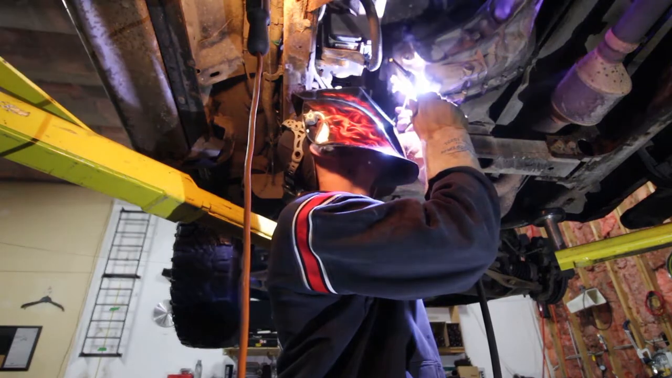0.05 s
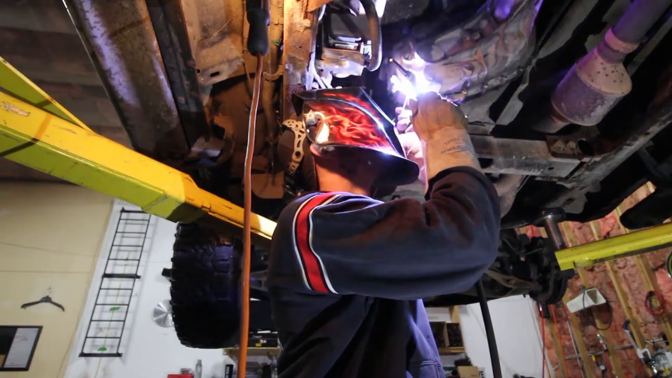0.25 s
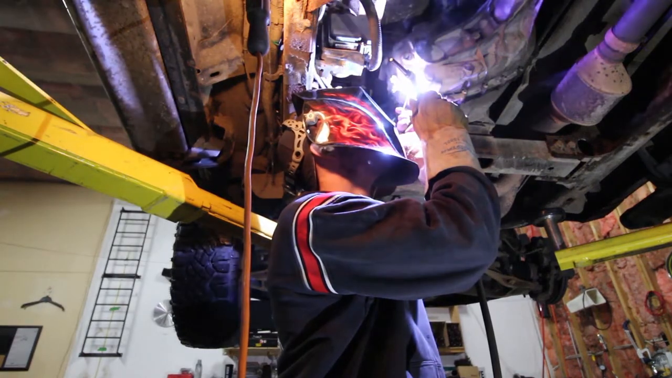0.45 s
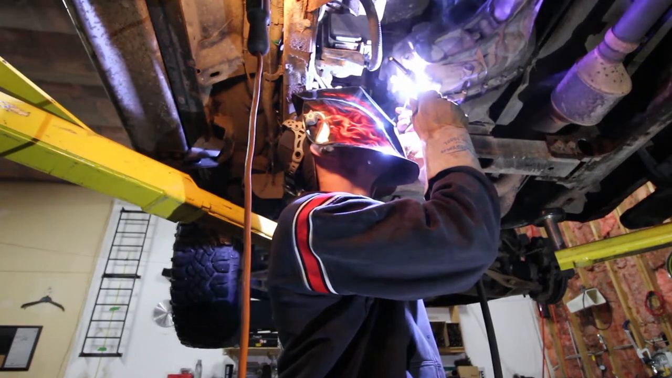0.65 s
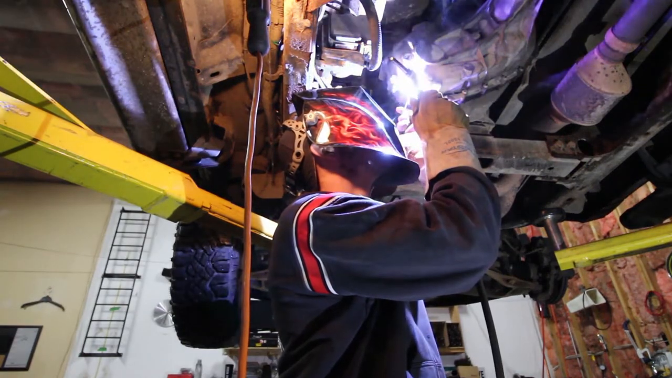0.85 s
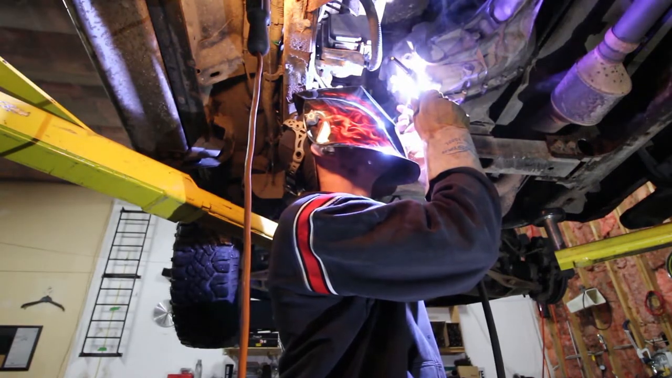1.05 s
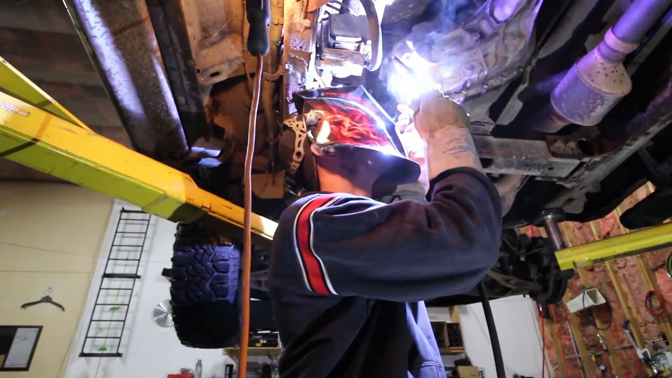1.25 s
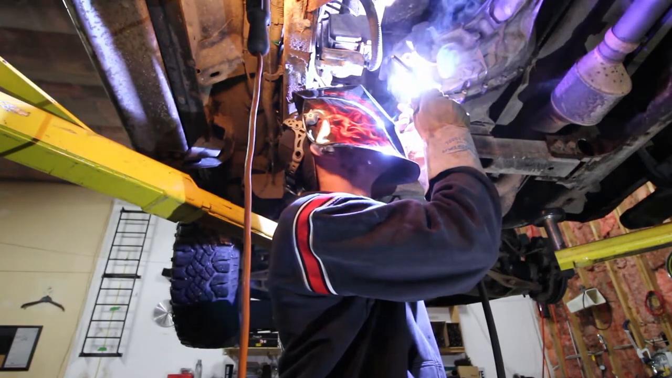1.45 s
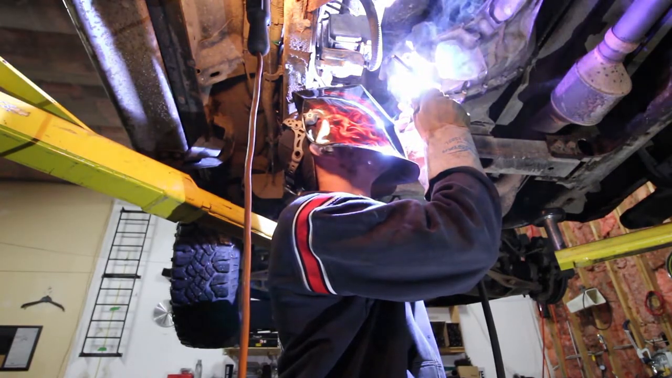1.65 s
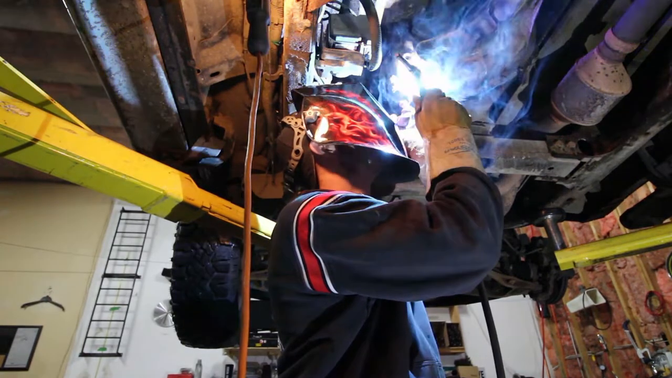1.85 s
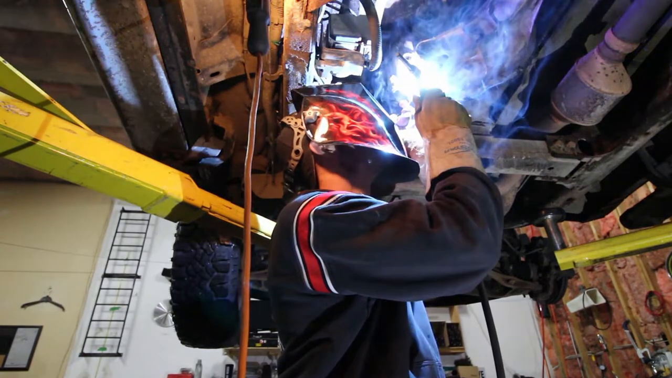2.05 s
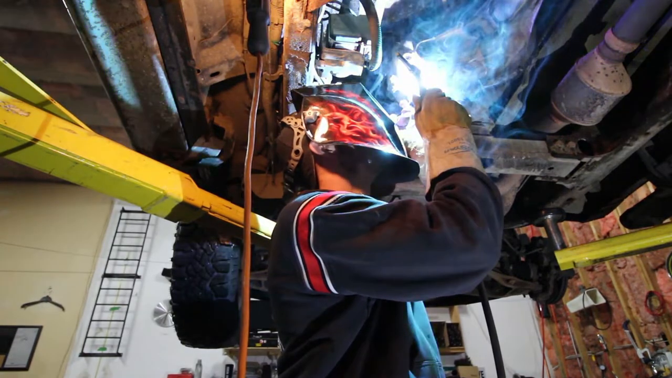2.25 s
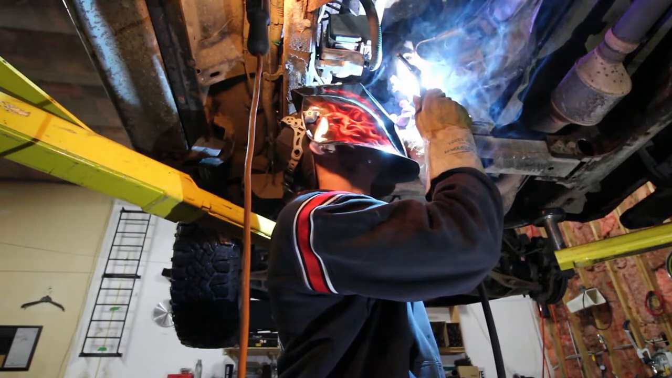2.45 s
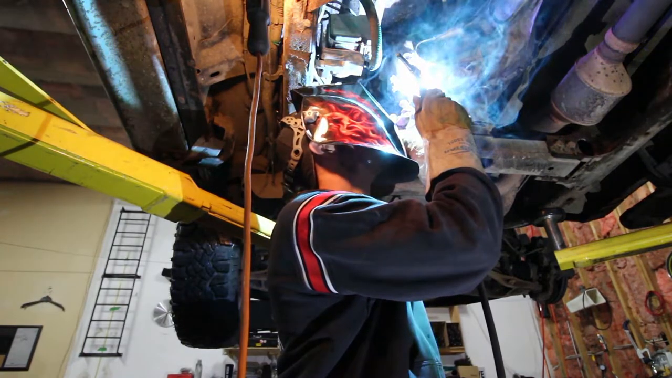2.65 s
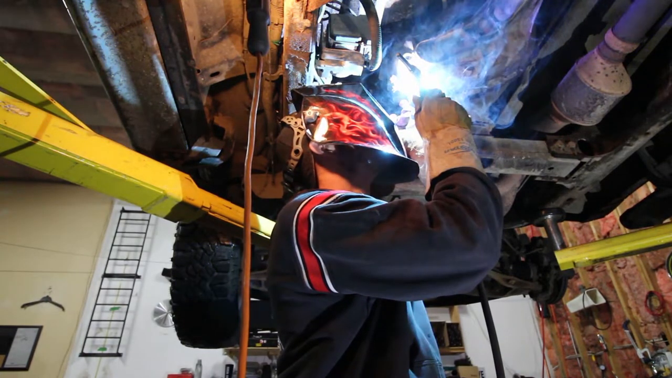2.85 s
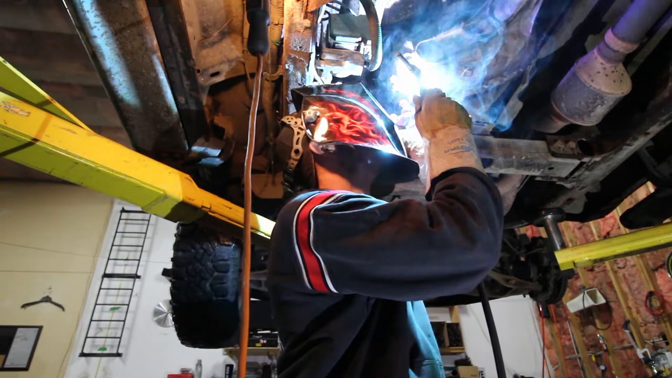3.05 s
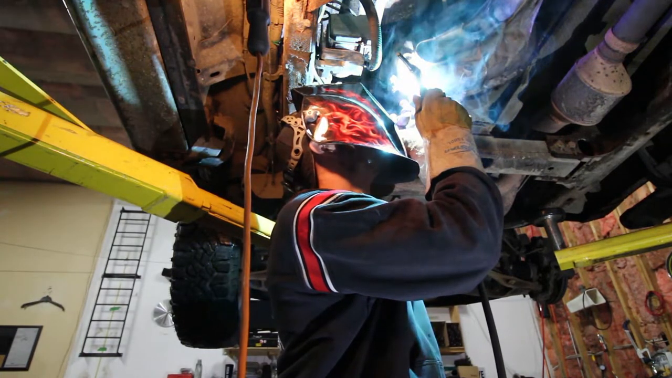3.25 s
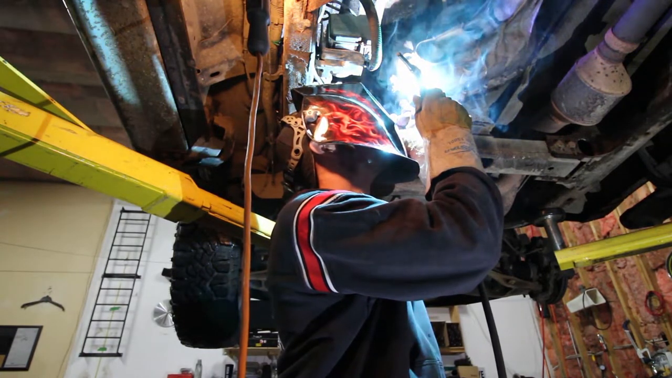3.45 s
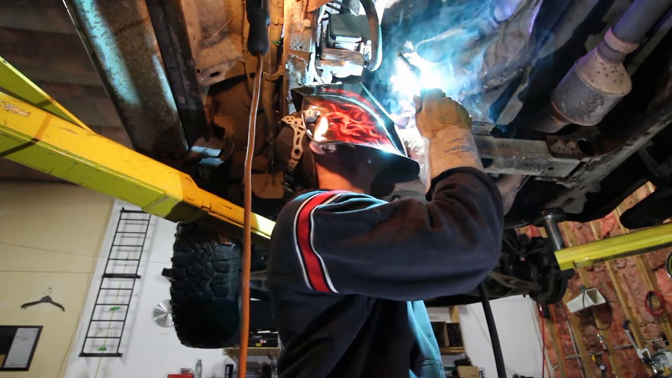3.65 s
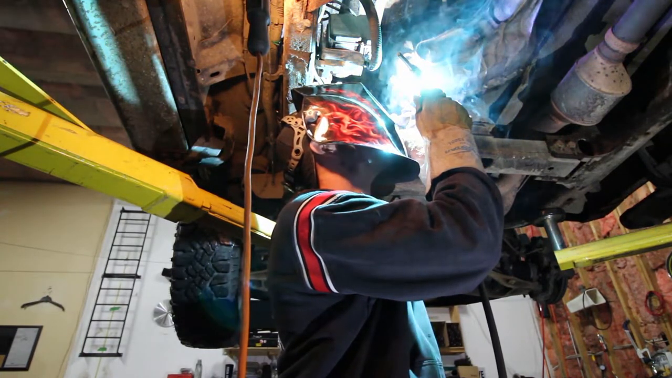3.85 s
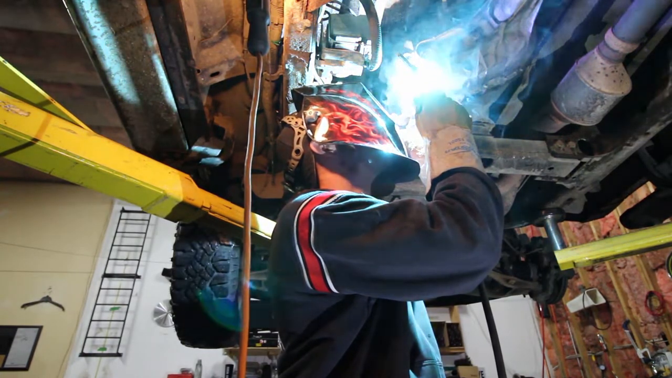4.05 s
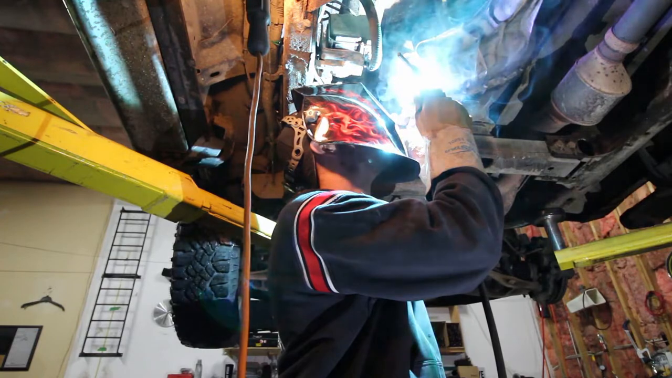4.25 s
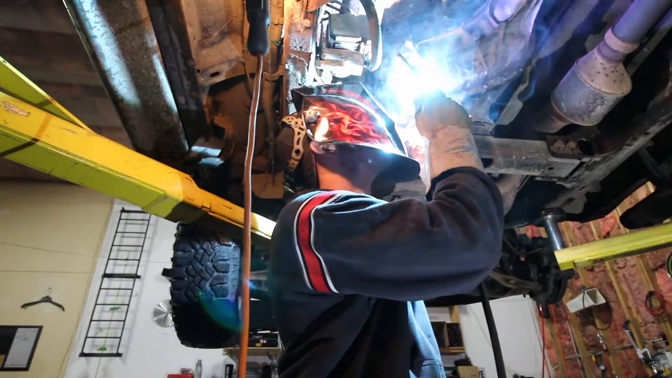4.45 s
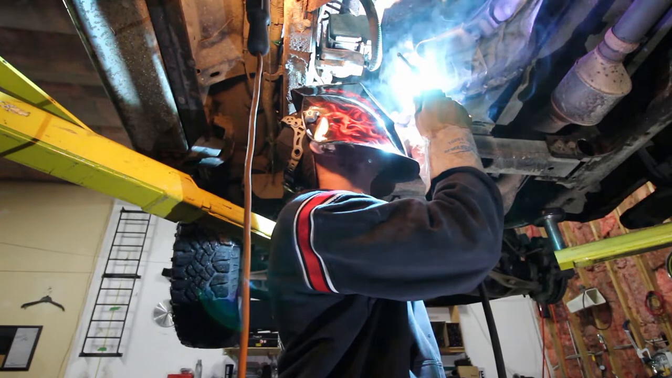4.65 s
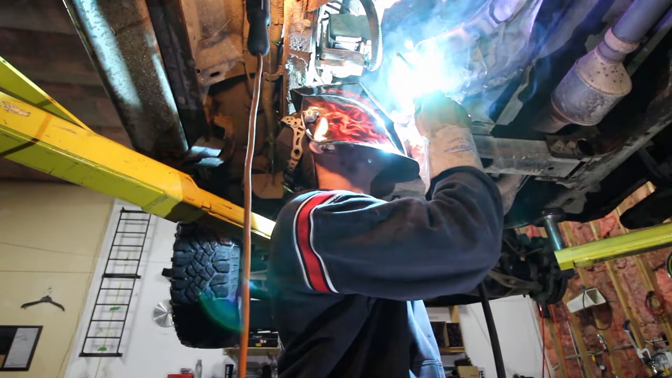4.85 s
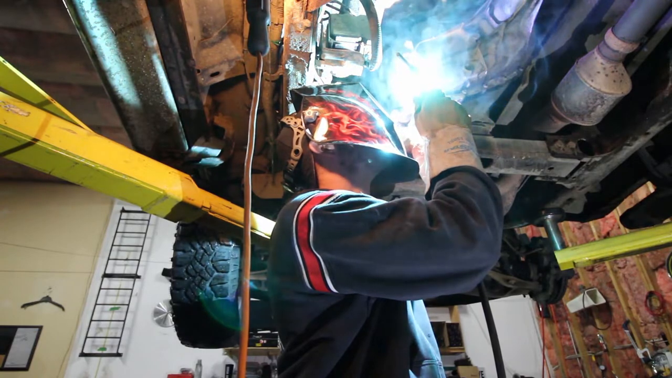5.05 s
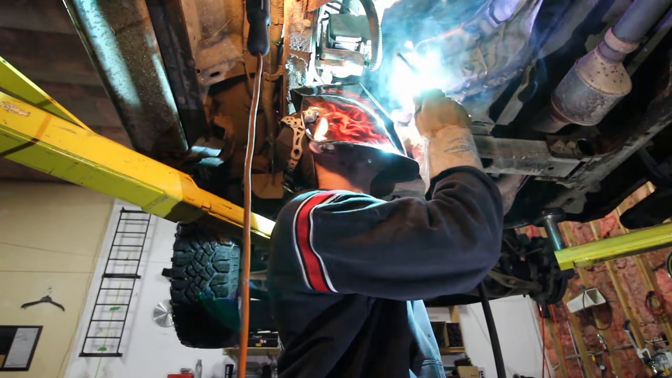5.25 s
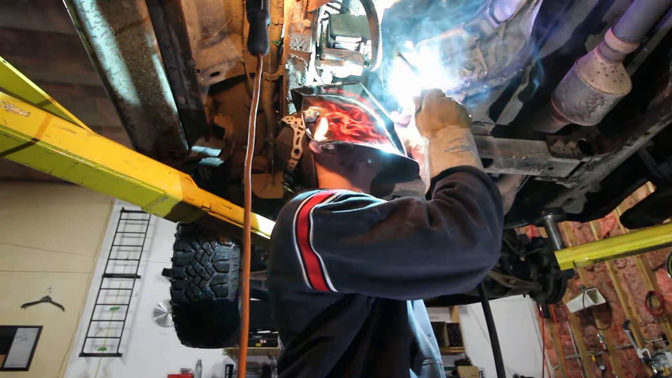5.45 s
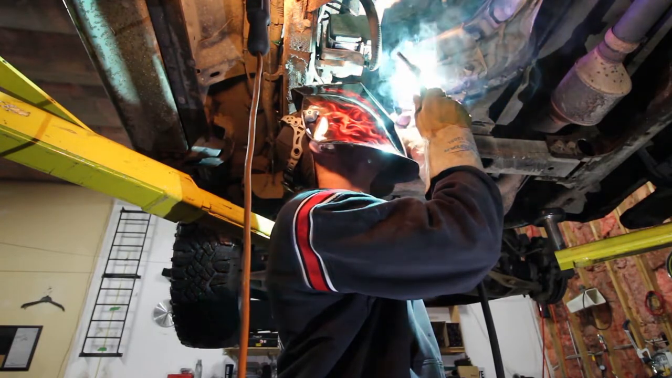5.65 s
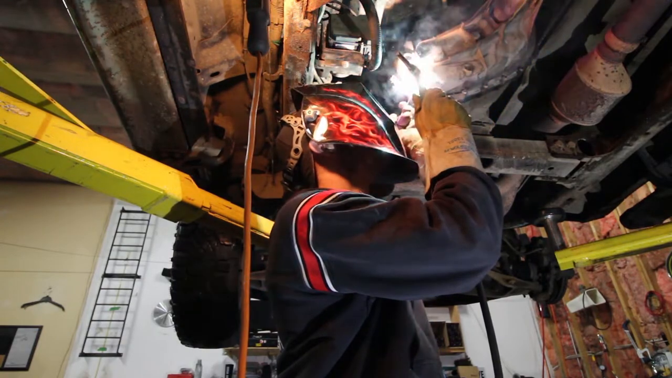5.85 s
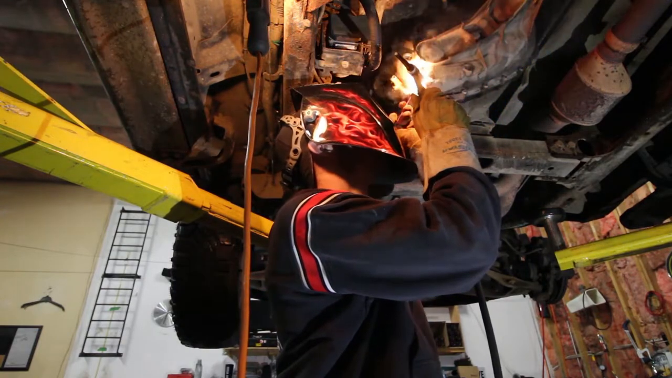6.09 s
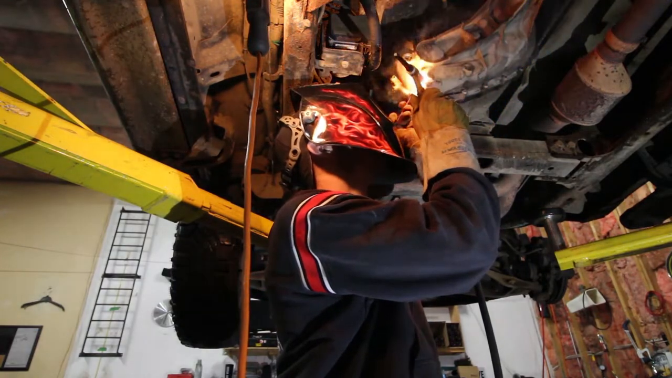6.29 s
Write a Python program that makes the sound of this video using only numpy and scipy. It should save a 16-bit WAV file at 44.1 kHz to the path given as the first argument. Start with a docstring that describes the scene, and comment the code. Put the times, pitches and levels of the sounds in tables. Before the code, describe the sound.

A welder works beneath a raised car in a garage, heard close. The arc rasps steadily at a low sixty-cycle pitch, sizzling and spitting, with low transformer hum beneath. It hitches once early and becomes more metallic; a few heavy pops punch through. Near the end it misfires with a loud spit, eases down and stops, while gas keeps hissing softly.

```python
"""An AC TIG arc burns on aluminium under a car on a garage lift: two impulse snaps per mains cycle, noise
sizzle through one half cycle, and spits at listed times, all ringing in a resonant underbody response.
The welder hums in sine partials that follow the current; low puffs come with some spits. At 1.83 s the
buzz skips and changes colour. The current is eased off, the arc goes out, and the gas noise hisses on."""
import sys
import numpy as np
from scipy import signal
from scipy.fft import rfft, irfft
from scipy.io import wavfile
from scipy.ndimage import uniform_filter1d

SR = 44100
rng = np.random.default_rng(int(sys.argv[2]) if len(sys.argv) > 2 else 0)


def to_wav(sig):
    """Store sig (one row per channel, or 1-D mono) as 16-bit WAV at the path in sys.argv[1].

    Samples outside -1..1 are clipped; the rate is SR.
    """
    pcm = np.clip(np.atleast_2d(sig), -1, 1) * 32767
    pcm = np.round(pcm).astype(np.int16)
    wavfile.write(sys.argv[1], SR, pcm.T)  # frames by channels


N = 278712
T = np.arange(N) / SR

# welding current re full: start_s, level_db
CURRENT = [(0, -4), (.4, -3.5), (.6, -2), (.98, -2), (1.25, -0.5), (1.5, -0.5), (1.72, -1.5), (1.83, -1.5),
           (1.92, -1.9), (2.8, -1.58), (4.9, 0.2), (5.33, -0.2), (5.45, -3), (5.6, -1.5), (5.7, -3.5),
           (5.85, -11), (5.96, -3)]
# first strike on the oxide: start_s, level_db
STRIKE = [(0, -6), (.5, 1), (.72, -1.5), (.88, -4), (1.04, -5.5), (1.3, -2.5), (1.44, -4), (1.8, -2.5),
          (2, -3), (2.5, -1.5), (3.1, -0.5), (3.5, -3), (4.9, 5), (5.3, 4.5), (5.47, -5), (5.63, 1),
          (5.78, -15.5), (5.96, -15)]
# fullness of the first strike, lows: start_s, level_db
BODY = [(0, 3.5), (.6, -5), (.95, 9), (1.25, 5.5), (1.45, 7), (1.8, 4), (2.2, -3.5), (3.2, 3), (3.85, 4.5),
        (4.45, -3), (5.3, -5), (5.5, -1), (5.62, -9.5), (5.96, 9)]
# treble of the snaps, duller as the pool melts, brighter as it cools: start_s, level_db
TREBLE = [(0, 2.5), (.95, 1.5), (1.25, 6), (1.5, 3.5), (1.9, 2.5), (2.9, 1), (3.7, -3.5), (5.25, -20),
          (5.5, 1.5), (5.96, -2.5)]
# unrest from cycle to cycle; the sign flips the skew of the scatter: start_s, scatter_db
UNREST = [(0, -4.5), (.9, 3.5), (1.2, -3), (1.5, 3), (1.9, 7.5), (3.5, 5), (4.6, 5), (5.2, 5.5), (6, 6.5)]
# re-strikes that flare up, thickest while the oxide is cold: start_s, low_db, middle_db, ring_db, treble_db
SPITS = [(0.0288, -8, -7.5, -2, -4), (0.0623, -10, -6, -5, -10), (0.1454, -9, -9, -13, -16),
         (0.178, -8.5, -11, -15, -9), (0.2121, -6, -4.5, -19, -10), (0.2286, -9, -10, -23, -11),
         (0.2457, -8.5, -16, -5, -7), (0.2788, -10, -6, -7, -6.5), (0.2954, -6.5, -10, -4, -8),
         (0.3123, -11, -7, -11, -10), (0.3287, -13, -7.5, -5.5, -9), (0.3622, -22, -7, -7, -7.0),
         (0.4123, -7.5, -10, -6, -9), (0.4453, -9, -5, -2, -6), (0.4789, -9, -3, -10, -12),
         (0.5124, -10, -2.5, -1.0, -2), (0.5454, -5.5, -1, -9, 0), (0.563, -11, -3, 0, 1),
         (0.5785, -6, -3, 2, 2), (0.612, -0.5, 3, 3, 1.5), (0.6285, -6, -4, 0.5, -1.0),
         (0.6788, -3, -4.5, -13, -6), (0.6956, -5, -14, -7.0, -6), (0.7285, -4, -9, -4, -9),
         (0.7454, -5.5, -6, -11, -7), (0.7624, -6.5, -2, -6, -10), (0.812, -6, -3, -8, -13),
         (0.8289, -5.5, -10, -7, -12), (0.8455, -4, -11, -13, -11), (0.8621, -8, -5, -5, -11),
         (0.9957, -8, -12, -3.0, -2.0), (1.379, -3.5, -1, -7, -3.0), (1.3955, -1.5, -11, -5, -4),
         (1.4122, 0.5, -5, -2.0, -3), (1.4292, -1, -6, -12, -1), (1.4458, -2, -4, -18, -4),
         (1.4789, -2, -3, -8, -3), (1.4956, -1.5, -10.5, -5, -5), (1.5121, -4, -12, -12, -6),
         (1.5289, -6, -1, -15, -8), (1.5622, -1.5, -10, -8, -9), (1.5955, -2, -6, -9, -3),
         (1.6282, -7, -4, -5, -5), (1.662, -10, -3, -7, -4), (1.6949, -9, -8, -5.5, -4),
         (1.7463, -2.5, -15, -4, -3), (1.941, -9, -17, -7, -4), (1.958, -9.5, -14, -7, -6),
         (1.9742, -14, -15, -5, -6), (2.0073, -16, -7, -6, -3.5), (2.0243, -7, -7, -10, -6),
         (2.041, -9, -12, -3, -5), (2.0909, -15, -12, 0, -2), (2.391, -8.5, -7, -6.5, -0.5),
         (2.591, -5.5, -5.5, -0.5, 4), (2.741, -13.5, -11, -6, -3.5), (3.1076, -8, -9, -4, -3),
         (3.5078, -3, 0.5, 0, 1), (3.8241, 3, -6, 0.5, -1), (4.241, -4, -6, 2.5, -3), (5.421, 0, -23, 2, 2),
         (5.4246, -25, -13, -5, -11), (5.5245, -12, -13, -12, -6), (5.6077, -11, -6, -3.5, -4),
         (5.6244, -8, -8, -2, -1.5), (5.6412, -12, -6, -14, -7), (5.6579, -10, -9, -13, -8),
         (5.6745, -15, -16, -11, -5), (5.6912, -27, -11, -16, -6), (5.8412, -22, -27, -32, -23),
         (5.8582, -23, -30, -28, -17), (5.9078, -21, -19, -20, -13.5), (5.9248, -27, -22, -26, -17),
         (5.9656, -15, -12.5, -12, -8)]
# borders of the four registers of a spit: edge_hz
SPIT_EDGES_HZ = (2200, 3600, 5700)
# span in which the arc fails before its heaviest spit: start_s, end_s
MISFIRE_S = (5.404, 5.42)
# oxide burning off: start_s, level_db
SIZZLE = [(0, -5), (.45, -10.5), (.6, -6), (1.0, -5), (1.3, -4), (1.95, -7.5), (2.35, -1.5), (2.6, -7.5),
          (3.75, 0.5), (4.35, -2), (4.55, -1.5), (4.8, -2.5), (5.2, -7), (5.39, 2.5), (5.46, -12.5),
          (5.96, -14.5)]
# colour of the sizzle: freq_hz, level_db
SIZZLE_COLOUR = [(40, -12), (200, 2.5), (1200, 0), (3200, 0), (5200, -2), (8000, -3.5), (15000, -2.5)]
# colour of a snap before and after the skip: freq_hz, level_db
SNAP_EARLY = [(30, -60), (60, -41), (200, -18), (450, -17), (650, -9.5), (1200, -6.5), (2000, -5),
              (3000, -7), (5200, -1), (8500, -5.5), (12000, -4.5), (15700, -16.5)]
SNAP_LATE = [(30, -54), (60, -49), (200, -13.5), (450, -11), (650, -6.5), (1200, -2.5), (1700, -4.5),
             (2200, -4), (3000, -2.5), (5200, -0.5), (8500, -3), (12000, -5), (15700, -9)]
# resonances and notches of the work and hollows, before and after the skip: freq_hz, width_hz, level_db
RING_EARLY = [(660, 60, 5), (840, 100, 3), (1120, 120, 5), (1560, 100, 2), (2220, 70, 5), (2380, 100, -6),
              (2560, 220, 5), (2780, 350, 6), (3120, 120, 5), (3420, 200, -2), (3660, 150, 4),
              (4340, 150, 4), (5000, 400, 8), (5400, 200, 3), (6900, 300, 8), (7800, 200, 3),
              (8300, 900, -5), (10500, 200, 4), (11200, 200, 4)]
RING_LATE = [(660, 60, 6), (840, 100, 4), (1100, 100, 5), (1320, 80, 2), (1540, 120, 3.5), (2100, 150, 6),
             (2340, 100, -5), (2560, 220, 7), (2880, 400, 3), (3180, 120, 9), (3620, 200, 7.5),
             (4080, 150, 6), (4360, 120, -3), (4790, 420, 9), (5170, 160, -4), (5440, 300, 6),
             (5740, 400, 6), (6120, 250, 3), (6420, 200, 3), (6880, 220, 7), (7300, 200, -4),
             (7680, 250, 6), (8500, 250, 3), (9930, 150, 6), (10980, 400, 6), (11760, 800, 5)]
# diffuse echoes of the underbody, weakest near 5 kHz: freq_hz, level_db
ECHO_COLOUR = [(200, 17.5), (700, -1.5), (1800, 4), (3300, 5.5), (4200, 8.5), (5000, -8.5), (6000, 1),
               (8000, 5.5), (15000, -4)]
# low puffs of hot gas: start_s, level_db
PUFFS = [(0.615, -47), (0.996, -50), (1.412, -48), (1.83, -49), (2.591, -42), (3.508, -33), (3.822, -59),
         (5.422, -27)]
# load hum, with steady arc lines at multiples 11, 14 and 18: mains_multiple, before_skip_db, after_skip_db
HUM = [(2, 1.8, 0.6), (3, -13.5, -7.5), (4, -7.5, -11.5), (5, -13, -14), (6, -4.5, -3.5), (7, -5, -6),
       (11, -5, -5), (14, -8, -8), (18, -1, 1)]
# hum of the idling welder: mains_multiple, rms_db
IDLE = [(2, -76), (3, -72), (5, -73), (7, -78), (14, -79), (19, -78)]
# shielding gas, density per Hz: freq_hz, level_db
GAS = [(260, -25), (450, -4), (650, -3), (1000, -4), (1800, -11), (2400, -10), (3000, 0), (3200, 3),
       (3700, 6), (4400, -4), (4750, -1), (5050, -5), (5400, -3), (6000, -10), (7300, -13), (8600, -7),
       (11500, -19), (15500, -28)]

MAINS_HZ = 60
SKIP_S, OUT_S = 1.83, 5.96  # the buzz skips and changes colour; the arc goes out
EARLY_LAG_S, LATE_LAG_S = .01195, .00755  # first strike within the mains cycle, before and after the skip
HALF_CYCLE_S = .00709  # first to second strike; the half cycles are unequal
RELIGHT_S_PER_DB = .00002  # more current relights the arc sooner
BODY_SCATTER_SHARE = .9  # body scatter against size scatter
SUCTION_HZ = 2000  # low-pass of the suck back after a relight
PANEL_ECHO_S = .00456  # echo off the nearest flat panel
HUM_FADE_DB_PER_S = 327  # after the arc is out, before the factor for each partial
GAS_RMS_DB = -55
TOP_HZ = 16000


def undb(db):
    """Decibels to gain."""
    return 10 ** (np.asarray(db) / 20)


def unit(x):
    """Scale to an energy of 1."""
    return x / np.sqrt(np.sum(x ** 2))


def curve(table, t):
    """Value of a control at times t."""
    return np.interp(t, *np.transpose(table))


def spectrum_db(points, hz):
    """Join (Hz, dB) points on a log-frequency axis."""
    f, db = np.transpose(points)
    return np.interp(np.log(hz + 1), np.log(f), db)


def coloured(x, colour):
    """Give x a spectrum and a spread of 1."""
    hz = np.arange(N // 2 + 1) * SR / N
    out = irfft(rfft(x) * undb(spectrum_db(colour, hz)), N)
    return out / out.std()


def band(x, hz, kind, order=2):
    """Low- or high-pass without delay."""
    sos = signal.butter(order, min(hz, .45 * SR), kind, fs=SR, output="sos")
    return signal.sosfiltfilt(sos, x)


def walk(t, rate_hz):
    """Slow chance with a spread near 1: random knots joined by lines."""
    knots = rng.standard_normal(int(rate_hz * N / SR) + 2)
    return np.interp(t * rate_hz, np.arange(len(knots)), knots)


def tail(t, t60_s, arrival_s):
    """Dense echoes: noise that begins after arrival_s and decays by 60 dB in t60_s."""
    decay = np.exp(-np.log(1000) * t / t60_s)
    return unit(rng.standard_normal(len(t)) * decay * (t > arrival_s))


def clicks(times, sizes, order=6):
    """Band-limited impulses at exact times: windowed sinc."""
    at = np.floor(times * SR).astype(int)[:, None] + np.arange(1 - order, order + 1)
    off = at - times[:, None] * SR
    shape = np.sinc(off) * np.cos(np.pi * off / (2 * order)) ** 2
    return np.bincount(np.clip(at, 0, N - 1).ravel(), (sizes[:, None] * shape).ravel(), N)


def snaps(times, db, body_db, treble_db, body_hz=2300, treble_hz=8300):
    """Pressure pulses of the arc; a slow flare has more body, a quick one more treble."""
    size = undb(db)
    body = band(clicks(times, size * (undb(body_db) - 1)), body_hz, "low")
    treble = band(clicks(times, size * (undb(treble_db) - 1)), treble_hz, "high")
    return clicks(times, size) + body + treble


def strike_times(delay_s):
    """One strike per mains cycle, delay_s after the first strike; a spit takes the place of a strike."""
    cycles = np.arange(-1, N / SR * MAINS_HZ) / MAINS_HZ + delay_s
    early, late = cycles + EARLY_LAG_S, cycles + LATE_LAG_S
    early = early[(early > 0) & (early < SKIP_S)]
    late = late[(late > SKIP_S) & (late < OUT_S)]
    times = np.r_[early, late]
    spit_gap_s = np.abs(times[:, None] - np.array(SPITS)[:, 0]).min(axis=1)
    return times[spit_gap_s > HALF_CYCLE_S / 2]


def first_strikes(level_db=-3.5, body_db=4.5, treble_db=-0.5, treble_scatter_db=4.0, flare_db_per_db=0.46,
                  spread_limit=0.87, jitter_s=.000014, drift_s=.000035):
    """The arc takes hold on the oxide skin: uneven in size, colour and timing; some strikes all but fail."""
    times = strike_times(0)
    db, body, treble, scatter = (curve(table, times) for table in (STRIKE, BODY, TREBLE, UNREST))
    late, big, full, bright = np.minimum(rng.standard_normal((len(times), 4)), spread_limit).T
    times = times + jitter_s * late + drift_s * walk(times, 2.98)
    db = db + scatter * big
    body = body + body_db + BODY_SCATTER_SHARE * scatter * full
    # a big strike flares for longer, so its treble lags behind its level
    treble = treble + treble_db + treble_scatter_db * bright - flare_db_per_db * db
    return -snaps(times, db + level_db, body, treble)


def second_strikes(early_db=-2.0, late_db=1.5, db_per_current_db=2.5, suction_gain=1.6,
                   suction_scatter_db=2.0, treble_db=-1.5, treble_share=1.56, flare_db_per_db=0.47,
                   scatter_db=0.0, jitter_s=.00001, drift_s=.00002):
    """The hot tungsten relights the reversed arc: quick push, slower suck back, growing with the current."""
    times = strike_times(HALF_CYCLE_S)
    current, treble = (curve(table, times) for table in (CURRENT, TREBLE))
    late, big, full = rng.standard_normal((len(times), 3)).T
    times = times - RELIGHT_S_PER_DB * current + jitter_s * late + drift_s * walk(times, 3.24)
    db = db_per_current_db * current
    treble = treble_db + treble_share * treble - flare_db_per_db * db
    db = db + np.where(times < SKIP_S, early_db, late_db) + scatter_db * big
    keep = np.exp(-2 * np.pi * SUCTION_HZ / SR)
    pulls = clicks(times, suction_gain * undb(db + suction_scatter_db * full))
    suck = signal.lfilter([0, 1 - keep], [1, -keep], pulls)
    return snaps(times, db, 0, treble) - suck


def sizzle(early_db=-25, late_db=-24.5, scatter_db=2.0, grain_db=4.5, rest_db=-17):
    """Tiny arc spots tear at the oxide from first to second strike: grainy noise, gated each cycle."""
    db = curve(SIZZLE, T) + np.where(T < SKIP_S, early_db, late_db) + scatter_db * walk(T, MAINS_HZ)
    since_s = (T - np.where(T < SKIP_S, EARLY_LAG_S, LATE_LAG_S)) % (1 / MAINS_HZ)
    gate = np.where(since_s < HALF_CYCLE_S, 1, undb(rest_db)) * (T < OUT_S)
    grains = rng.standard_normal(N) * undb(grain_db * rng.exponential(size=N).clip(0, 5))
    return coloured(grains, SIZZLE_COLOUR) * gate * undb(db)


def register(x, k):
    """One of the four registers of a spit, low to high; together they give x back."""
    def below(edge):
        return band(x, SPIT_EDGES_HZ[edge], "low", order=4)

    upper = below(k) if k < len(SPIT_EDGES_HZ) else x
    return upper - (below(k - 1) if k > 0 else 0)


def spits(response, during):
    """Flares of uneven length: slow ones pop low, quick ones ring the work or crack in the treble."""
    times, *levels = np.transpose(SPITS)
    padded = np.pad(response, 512)
    out = 0
    for k, db in enumerate(levels):
        flares = register(clicks(times, undb(db)) * during, k)
        # each level holds for the register after the response
        out = out - flares / np.linalg.norm(register(padded, k))
    return out


def underbody(colour, rings, near_db=-3, near_t60_s=0.0094, floor_db=-5, floor_t60_s=0.052,
              panel_db=-6, panel_hz=3200, size=16384):
    """Response to a snap: direct, dull panel echo, near metal and car floor, coloured by resonances."""
    t = np.arange(size) / SR
    hz = np.arange(size // 2 + 1) * SR / size
    panel = undb(panel_db) * np.exp(-2j * np.pi * hz * PANEL_ECHO_S) / (1 + (hz / panel_hz) ** 4)
    direct = 1 + panel
    diffuse = undb(near_db) * tail(t, near_t60_s, .0008) + undb(floor_db) * tail(t, floor_t60_s, 0.0014)
    wet = undb(spectrum_db(ECHO_COLOUR, hz))
    echoes = direct + wet * rfft(diffuse)
    # diffuse echoes give the fine comb only; the resonances set the broad shape
    wet_power = wet ** 2 * np.sum(diffuse ** 2)
    power = np.abs(echoes) ** 2 * (1 + wet_power) / (np.abs(direct) ** 2 + wet_power)
    fine, broad = uniform_filter1d(power, size=15), uniform_filter1d(power, size=81)
    share = np.clip(hz / 4500, 0, 1)
    flattening = np.sqrt((1 - share) * fine + share * broad)
    peaks = sum(peak / (1 + (2 * (hz - f) / width) ** 2) for f, width, peak in rings)
    # damping blunts the resonances
    db = spectrum_db(colour, hz) + uniform_filter1d(peaks, size=21)
    # minimum phase: resonances ring after the snap, never before it
    cepstrum = irfft(np.log(undb(db) / flattening))
    cepstrum[1:size // 2] *= 2
    cepstrum[size // 2 + 1:] = 0
    return unit(irfft(echoes * np.exp(rfft(cepstrum))))


def garage(arc, wall_db=-16, wall_t60_s=0.26, hand_db=-15, hand_t60_s=0.0085, count=9, size=16384):
    """The garage rings briefly; glove and helmet echoes shift as the torch creeps along the seam."""
    t = np.arange(size) / SR
    out = arc + undb(wall_db) * signal.fftconvolve(arc, tail(t, wall_t60_s, 0.0028))[:N]
    place = np.linspace(0, count - 1, N)
    for k in range(count):
        nearness = np.sqrt(np.maximum(1 - np.abs(place - k), 0))
        echo = signal.fftconvolve(arc * nearness, tail(t, hand_t60_s, 0.00056))[:N]
        out = out + undb(hand_db) * echo
    return out


def puffs(length_s=0.00049):
    """One slow swing of pressure as the gas expands."""
    out = np.zeros(N)
    for start_s, db in PUFFS:
        age = np.maximum(T - start_s, 0) / length_s
        out += undb(db) * age * (2 - age) * np.exp(-age) * 2
    return out


def mains(partials, load_db=0, lag_s=0):
    """Mains partials; the high ones grow faster with the load than the low ones."""
    out = 0
    for k, db in partials:
        wave = np.sqrt(2) * np.sin(2 * np.pi * (round(k) * MAINS_HZ * (T - lag_s) + rng.random()))
        out = out + wave * undb(db + load_db * (1 + k / 20))
    return out


def welder(hum_db=-48.0):
    """The transformer hums with its current, and steady lines at 660, 840 and 1080 Hz sing with the arc; at the
    skip the hum breaks step and shifts colour."""
    def across_skip(values):
        return np.interp(T, [SKIP_S, SKIP_S + HALF_CYCLE_S], values)

    load_db = curve(CURRENT, T) - HUM_FADE_DB_PER_S * np.maximum(T - OUT_S, 0)
    partials = [(k, across_skip(levels)) for k, *levels in HUM]
    load_hum = mains(partials, load_db, across_skip([EARLY_LAG_S, LATE_LAG_S]))
    return undb(hum_db) * load_hum + mains(IDLE)


def gas(fan_rms_db=-71, fan_hz=280):
    """Argon hisses out of the torch cup over the fan's low rush: two filtered noises."""
    rush = band(rng.standard_normal(N), fan_hz, "low")
    hiss = coloured(rng.standard_normal(N), GAS)
    return hiss * undb(GAS_RMS_DB) + rush / rush.std() * undb(fan_rms_db)


def scene(early_db=0, late_db=-1, early_spit_db=0.0, late_spit_db=2.0, misfire_db=-12):
    """The arc heard through underbody and garage, with puffs, hum and gas."""
    burning = np.where((T > MISFIRE_S[0]) & (T < MISFIRE_S[1]), undb(misfire_db), 1)
    buzz = burning * (first_strikes() + second_strikes() + sizzle())
    stages = ((T < SKIP_S, SNAP_EARLY, RING_EARLY, early_db, early_spit_db),
              (T >= SKIP_S, SNAP_LATE, RING_LATE, late_db, late_spit_db))
    arc = 0
    for during, colour, rings, buzz_db, spit_db in stages:
        response = underbody(colour, rings)
        pulses = undb(buzz_db) * buzz * during + undb(spit_db) * spits(response, during)
        arc = arc + signal.fftconvolve(pulses, response)[:N]
    return (garage(arc) + puffs() + welder() + gas())[None]


def record(dry):
    """Clip at full scale, then cut steeply above TOP_HZ."""
    low_pass = signal.ellip(10, .2, 80, TOP_HZ, fs=SR, output="sos")
    return signal.sosfilt(low_pass, np.clip(dry, -1, 1))


dry = scene()
out = record(dry)
to_wav(out)
```